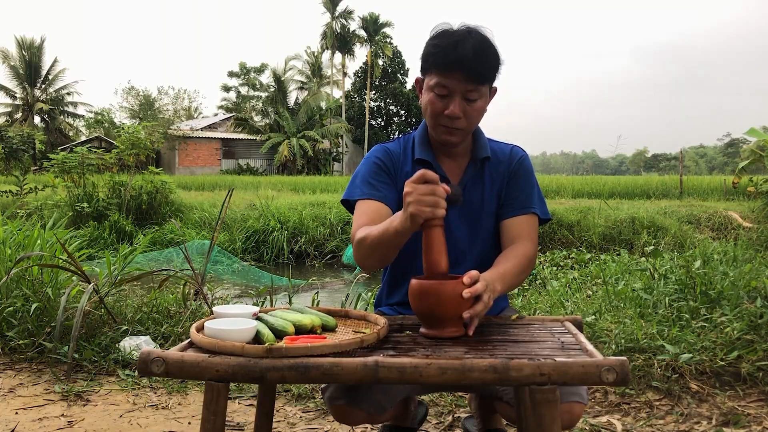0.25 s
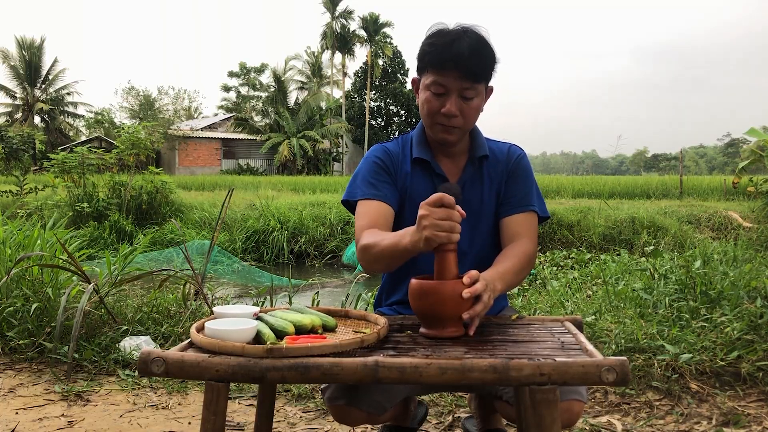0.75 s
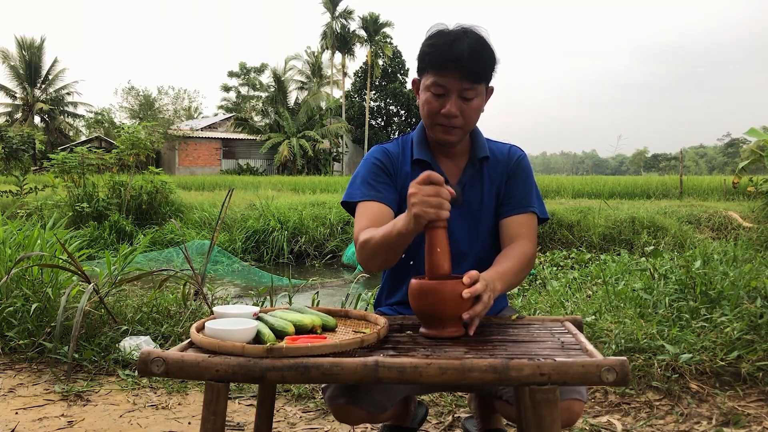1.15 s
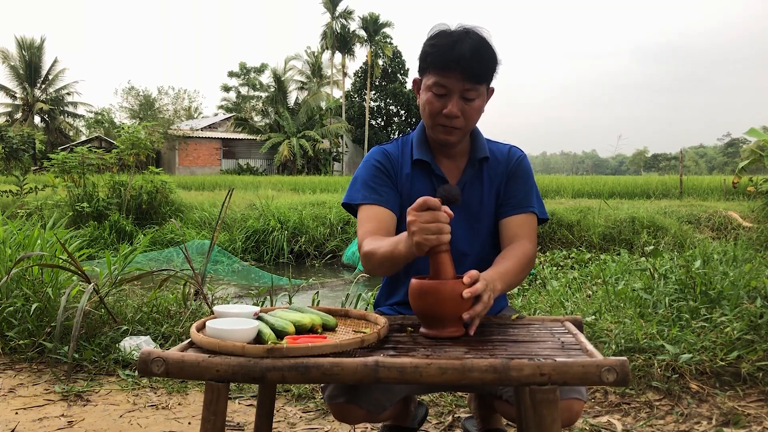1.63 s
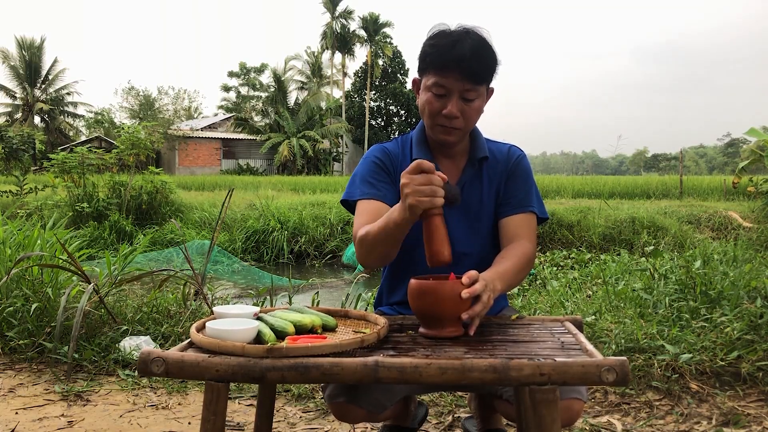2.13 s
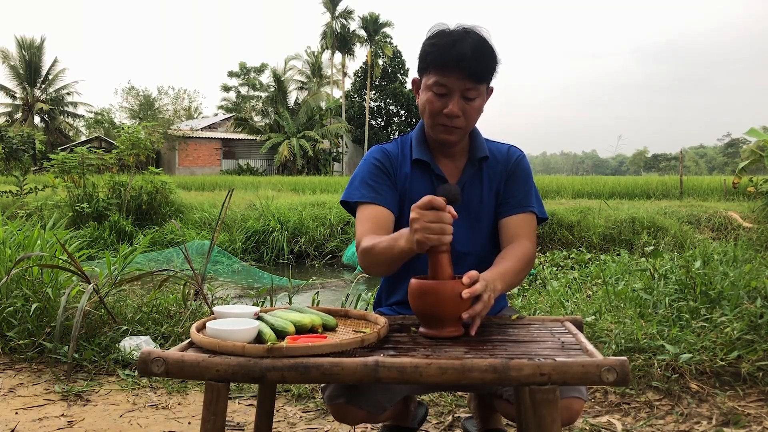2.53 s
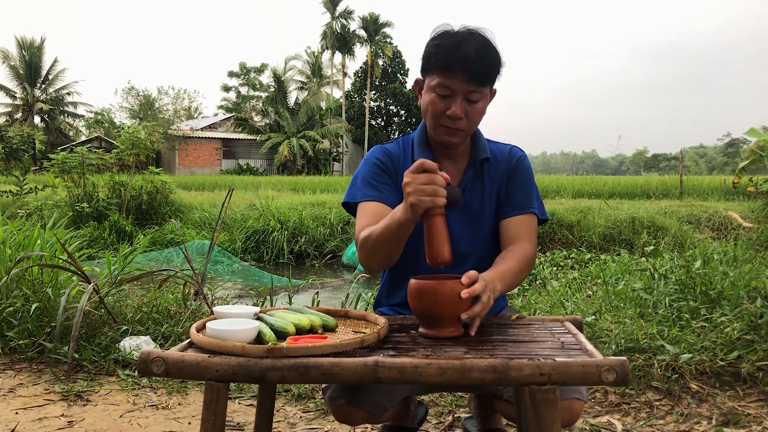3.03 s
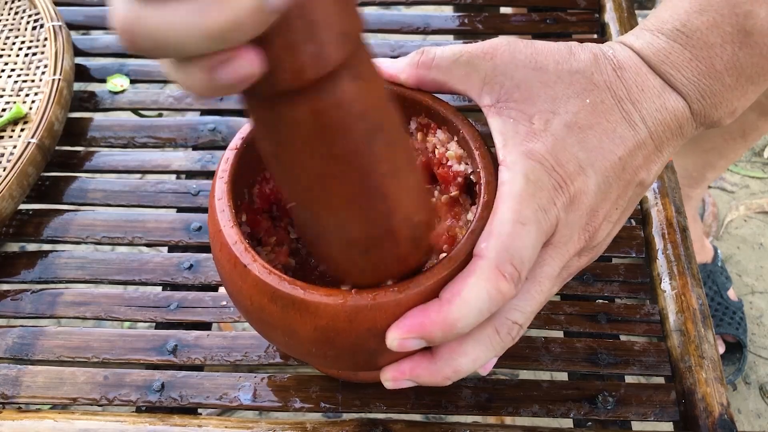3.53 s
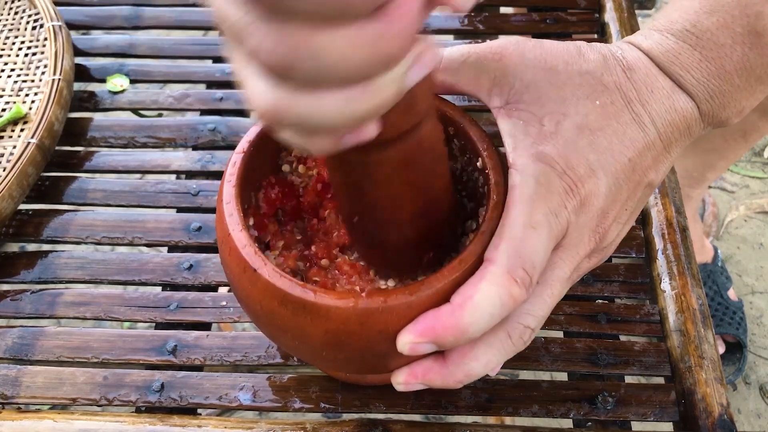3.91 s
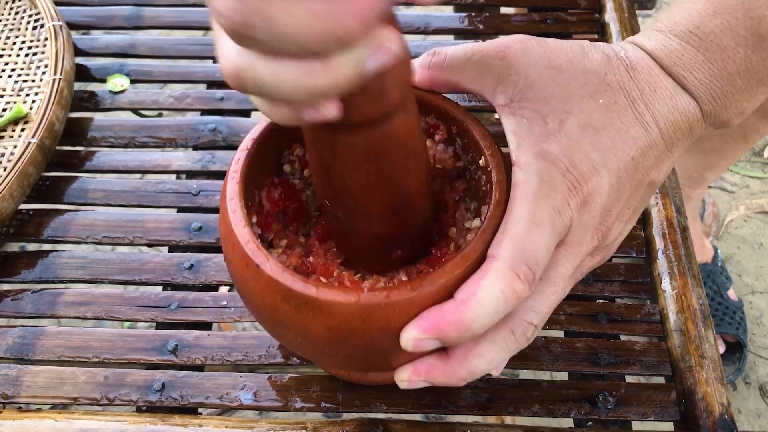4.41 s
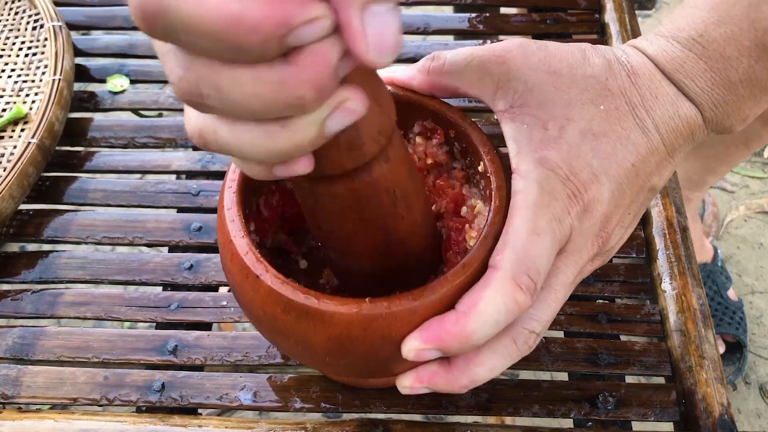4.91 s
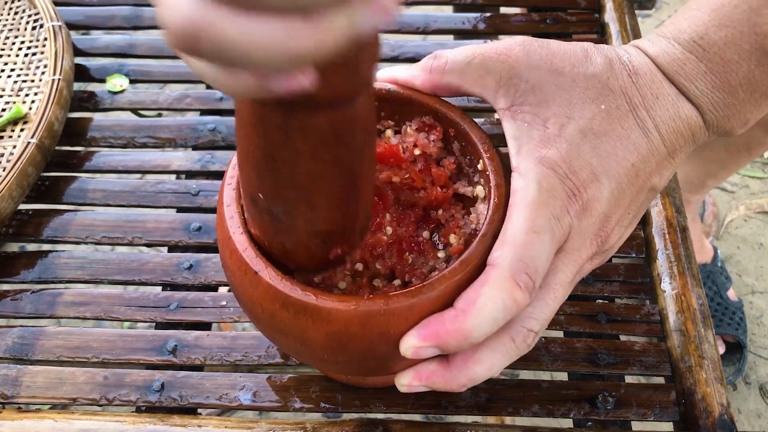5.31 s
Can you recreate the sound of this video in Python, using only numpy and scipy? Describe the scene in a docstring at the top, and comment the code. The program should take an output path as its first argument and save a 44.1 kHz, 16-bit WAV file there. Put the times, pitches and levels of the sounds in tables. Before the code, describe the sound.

A wooden pestle pounds coarse salt in a clay mortar, about three strokes a second. Each stroke is a crisp crunch with a short knock and a slight shake of the bamboo table, and loose grains slide and tick in between. The first strokes are heard from a distance over a faint outdoor hush. A little past halfway, a close microphone takes over, with slightly quicker strokes, clearer clay knocks and faint puffs of wind.

```python
"""Out in the fields, a wooden pestle pounds coarse salt in a clay mortar on a slatted bamboo table.
Each stroke crushes grains, rings the bowl, shakes the slats and thuds through the legs into the soil.
Loose salt slides and ticks between strokes, over a hush of open air and a far rumble. A distant, peaky
microphone hears the first strokes; then a close, flatter one takes over and catches puffs of wind."""
import sys
import numpy as np
from scipy import signal
from scipy.fft import rfft, irfft, next_fast_len
from scipy.io import wavfile
from scipy.ndimage import uniform_filter1d, map_coordinates

SR = 44100
rng = np.random.default_rng(int(sys.argv[2]) if len(sys.argv) > 2 else 0)


def int16_out(signal):
    """Quantize to a 16-bit WAV file."""
    q = np.round(np.clip(np.atleast_2d(signal).T, -1, 1) * 32767)
    wavfile.write(sys.argv[1], SR, q.astype(np.int16))


N = 245195
TIME = np.arange(N) / SR
SWITCH_S = 3.33  # the close microphone takes over; paired settings are (distant, close)


def amp(db):
    return 10 ** (np.asarray(db) / 20)


def unit(x):
    return x / np.sqrt(np.mean(x ** 2) + 1e-20)


def along(points, hz):
    """Interpolate (Hz, value) points on a log axis."""
    f, v = np.transpose(points)
    return np.interp(np.log(hz + 1), np.log(f + 1), v)


def peak(hz, centre, width, db):
    """A resonant bump or dip, in dB."""
    return db / (1 + (2 * (hz - centre) / width) ** 2)


def wobble(rate):
    """A smooth random curve, rate knots a second."""
    return map_coordinates(rng.standard_normal(N // 20), [TIME * rate])


def filtered(x, response):
    """x times a complex response of frequency."""
    size = next_fast_len(N + SR // 2)
    return irfft(rfft(x, size) * response(np.fft.rfftfreq(size, 1 / SR)), size)[..., :N]


def band(x, low_hz, high_hz):
    """The part of x between two soft edges."""
    under = lambda hz, edge: 1 / (1 + (hz / edge) ** 8)
    return filtered(x, lambda hz: under(hz, high_hz) - under(hz, low_hz))


def coloured(x, db_of):
    """x through a causal filter of energy 1, shaped by a dB curve."""
    hz = np.fft.rfftfreq(2048, 1 / SR)
    cepstrum = irfft(np.log(amp(db_of(hz)) + 1e-6))
    cepstrum[1:len(hz) - 1] *= 2
    cepstrum[len(hz):] = 0
    pulse = irfft(np.exp(rfft(cepstrum)))
    return signal.fftconvolve(x, pulse[None] / np.linalg.norm(pulse), axes=1)[:, :N]


def patchy(x, depth_db):
    """x with its colour shifting from moment to moment."""
    frames = signal.stft(x, nperseg=256)[2]
    field = uniform_filter1d(rng.standard_normal(frames.shape), size=2, axis=0)
    field = uniform_filter1d(field, size=6, axis=1)
    return signal.istft(frames * amp(depth_db * unit(field)), nperseg=256)[1][:N]


def close_mic():
    """0 on the distant microphone, 1 on the close one, with a 6 ms crossfade."""
    return np.clip((TIME - SWITCH_S) / .006 + .5, 0, 1)


# Open air at each microphone, and a rumble far off: (frequency [Hz], relative level [dB])
HUSH_DISTANT = [(180, -47.5), (300, -18.5), (585, -7.5), (951, -20), (1160, -11.5), (1920, -18.5),
                (2380, -5), (3280, -9), (6180, -0.5), (6720, -7.5), (8210, -34.5), (10900, -21.5),
                (13600, -36), (15200, -9), (16300, -38.5)]
HUSH_CLOSE = [(200, -31), (350, -13.5), (650, -1), (800, -6.5), (1250, -1), (1900, -5.5), (2500, -8),
              (3100, -8), (3700, -15), (4300, -8), (5000, -8.5), (8000, -13.5), (11000, -14.5),
              (14000, -10), (16300, -9.5)]
FAR_RUMBLE = [(15, -34), (25, -9), (71, -0.5), (130, 4), (243, -7.5), (282, -5.5), (400, -10), (520, -40),
              (880, -120)]


def field_air():
    """The hush of the fields, wavering a little, over a lumpy far rumble."""
    def noise(spectrum, depth_db):
        restless = patchy(rng.standard_normal(N), depth_db)
        return unit(filtered(restless, lambda hz: amp(along(spectrum, hz))))

    close = close_mic()
    hush = amp(-59) * noise(HUSH_DISTANT, 2.3) * (1 - close) + amp(-70) * noise(HUSH_CLOSE, 1.5) * close
    rumble_db = -74.5 - 3.5 * close + 1.8 * wobble(7.4) + 0.94 * wobble(3.8)
    return hush * amp(1.2 * wobble(37)) + amp(rumble_db) * noise(FAR_RUMBLE, 0.93)


# Strokes into the salt, timed at full pressure; levels are relative within each column:
# (time [s], table thump [dB], wait before lifting [ms], crush [dB], rise [ms], hold [ms], fall [ms],
# treble [dB], lows [dB], settling [dB], slide on lifting [dB], bowl [dB], slat buzz [dB],
# tilt toward high modes [dB])
STROKES = [(0.217, -55, 50, -20, 13, 2.3, 44, 0, -9, -40.5, -46.5, -30.5, -32.5, 7.5),
           (0.505, -69, 50, -16.5, 14.5, 17.8, 53, -1, -9, -37, -43, -41, -53, -2),
           (0.815, -43.5, 58, -17.5, 12, 2.33, 15, 3.5, 18, -39, -43, -21.5, -31.5, 3),
           (1.129, -54, 67, -13.5, 10.5, 1.96, 6.7, 0.5, 8.5, -43, -47, -30, -41, 0),
           (1.447, -73, 52, -17.5, 38, 13.4, 24, -3, 6, -40, -46.5, -46, -55, 0),
           (1.749, -45, 73, -15, 9, 1.12, 58, -2.5, 8.5, -40.5, -43, -37, -31, 13),
           (2.043, -56, 64, -19, 10, 0.78, 38, -1, -21, -43.5, -46, -51, -43.5, 15.5),
           (2.37, -60.5, 68, -19.5, 9, 8.8, 25, 5.5, 8, -40, -45, -39, -44, -7),
           (2.665, -49.5, 78, -18.5, 6.8, 2.24, 5.6, 3.5, -11, -40, -44.5, -43, -34.5, 0),
           (2.942, -65.5, 65, -17.5, 17, 3.2, 73, 0.5, -2.5, -42.5, -41, -39.5, -39, 15.5),
           (3.222, -69, 48, -16, 25, 14.5, 35, 0, 2.5, -41.5, -47, -39, -56.5, -1.5),
           (3.466, -60, 52, -32.5, 97, 23.2, 53, -3.5, -1.5, -67, -54, -29, -50, 5),
           (3.718, -78.5, 65.4, -20, 43, 0.68, 13, 3, -6.5, -61.5, -47, -48, -66, 15),
           (3.942, -76, 69, -27.5, 3.1, 40, 44, -2.5, 6.5, -54.5, -56, -55, -69, 0),
           (4.243, -42.5, 42, -19.5, 10.6, 4.33, 29, 1.5, 1, -53.5, -58.5, -20.5, -29.5, -7.5),
           (4.481, -72, 46, -35, 23, 29.2, 47, 3.5, 4.5, -65, -59.5, -45, -56.5, 17.5),
           (4.739, -78.5, 59, -32, 12, 17.4, 82, 3.5, -5, -59.5, -53, -64, -65, 0),
           (5.003, -63, 59, -32.5, 18, 9.4, 44, 5, 2, -59, -54, -37.5, -48, -3),
           (5.261, -68, 68.4, -29, 21, 1.59, 93, 5, -11, -58, -50.5, -67, -63, -4),
           (5.493, -80, 74, -39, 37, 28.6, 82, -3.5, -2, -56.5, -61, -66, -65, 0)]
# The pestle glances off the bowl's wall: (time [s], table thump [dB], crush [dB], lows [dB],
# bowl [dB], slat buzz [dB], tilt toward high modes [dB])
GLANCES = [(1.425, -65, -17, 8.5, -38, -39, 13), (3.402, -61.5, -23, -1.5, -18.5, -45, 5.5),
           (3.634, -76, -49, 3.5, -39.5, -58, -6), (3.942, -61, -22, 5, -20.5, -48, 12),
           (4.679, -78, -51, 16, -37, -68, -1), (4.942, -74, -35.5, 13, -20.5, -47.5, -4),
           (5.43, -70, -49, 14.5, -35, -52, -5), (5.469, -74, -50.5, 10.5, -38, -55, 4)]
# Single crystals crack: (time [s], level [dB], treble [dB])
CRACKS = [(0.019, -41.5, -6), (0.039, -45, -8.5), (0.62, -38.5, -5), (0.704, -39, 3.5), (0.758, -51.5, 10),
          (0.839, -39, -1), (0.951, -50.5, 11.5), (1.244, -44.5, 2.5), (2.347, -48, -3), (3.216, -42, 3),
          (2.875, -57.5, 17), (3.321, -42, 3), (3.509, -54, -8), (4.305, -50, -8), (4.565, -57, 4),
          (3.461, -34.5, 5), (4.628, -60.5, -2), (4.713, -56, -6), (4.725, -42, -7), (4.755, -39, 12),
          (4.814, -42.5, -12), (5.008, -34.5, 10), (5.328, -50, -4), (5.34, -50, -6), (5.508, -28, 6)]
# The pestle drags through salt: (time [s], level [dB], hold [ms])
DRAGS = [(3.419, -46.5, 11), (3.645, -64, 16), (3.689, -44.5, 38), (3.908, -60.5, 1.6), (4.696, -57.5, 36)]
# Loose salt, distant then close: (rise [ms], hold [ms], fall [ms], treble [dB], lows [dB])
SETTLE_SHAPE = (90, 3, 540, -0.2, 11.5), (40.4, 9.9, 250, 1.5, 10)
SLIDE_SHAPE = (140, 13, 100, -2, -4.5), (160, 22.2, 124, 0.1, -13)


def salt_presses():
    """Every push on the salt: (time [s], level [dB], rise, hold, fall [ms], treble, lows [dB])."""
    rows = [(0.0044, -46.5, *SETTLE_SHAPE[0])]  # still settling from an earlier stroke
    for s, _, wait, db, rise, hold, fall, treble_db, low_db, settle_db, slide_db, *_ in STROKES:
        end, mic = s + hold / 1000, int(s > SWITCH_S)
        rows.append((s, db, rise, hold, fall, treble_db, low_db))
        rows.append((end, settle_db, *SETTLE_SHAPE[mic]))
        rows.append((end + wait / 1000, slide_db, *SLIDE_SHAPE[mic]))
    rows += [(s, db, 6.4, 1.4, 19, -22, low_db) for s, _, db, low_db, *_ in GLANCES]
    rows += [(s, db, 4.8, 2.4, 15, treble_db, -15) for s, db, treble_db in CRACKS]
    return rows + [(s, db, 9, hold, 60, 0, 0) for s, db, hold in DRAGS]


# Crushed salt at each microphone: (frequency [Hz], relative level [dB])
CRUNCH_DISTANT = [(180, -73), (300, -47.5), (728, -28.5), (1180, -30), (1540, -34), (2420, -15.5),
                  (3220, -18.5), (4000, -8), (6080, 3), (7190, -11), (8350, -31.5), (10700, -24.5),
                  (13600, -24), (15000, -12), (16300, -25)]
CRUNCH_CLOSE = [(180, -52.5), (300, -24.5), (658, -22), (919, -5), (1070, -10.5), (1220, 1.5), (1570, -19),
                (2160, -5), (2510, -13), (2770, 0.5), (3170, -7), (3700, -12.5), (4300, -4), (5320, -1.5),
                (9230, -7), (15200, -6), (16300, -4.5)]
# The bowl resonating under the salt: (frequency [Hz], width [Hz], boost [dB])
BOWL_RESONANCES = [(1170, 87, -0.5), (2186, 150, -2.5), (2412, 146, 8.5), (2780, 170, 0), (5270, 180, 2),
                   (5975, 380, -1.5)]


def salt_crunch(snaps_per_s=1500):
    """Crystals snap at random, of very uneven size, as hard as the pestle presses."""
    snapping = rng.random(N) < snaps_per_s / SR
    sizes = amp(3.5 * np.minimum(rng.exponential(size=N), 2.5))
    snaps = snapping * sizes * rng.choice([-1, 1], N)
    clumps = amp(1.3 * wobble(400) + 2.15 * wobble(70))
    grit = unit(clumps * patchy(rng.standard_normal(N) + 0.68 * unit(snaps), depth_db=4))
    power = np.zeros((2, 3, N))  # microphone, band, sample
    for s, db, *ms, treble_db, low_db in salt_presses():
        rise, hold, fall = np.maximum(ms, .5) / 1000
        span = slice(max(0, round((s - rise) * SR)), round((s + hold + fall) * SR))
        slack = np.clip((s - TIME[span]) / rise, 0, 1) + np.clip((TIME[span] - s - hold) / fall, 0, 1)
        bands_db = np.array([[low_db], [0], [treble_db]])
        power[int(s > SWITCH_S), :, span] += amp(db - 60 * slack + bands_db) ** 2
        grit[min(N - 1, round(SR * (s + hold / 2)))] = 7  # one big crystal breaks at full pressure
    ring_db = lambda hz: sum(peak(hz, *resonance) for resonance in BOWL_RESONANCES)
    crunch = np.zeros(N)
    for force, spectrum, gate in zip(np.sqrt(power), (CRUNCH_DISTANT, CRUNCH_CLOSE), (1 - close_mic(), 1)):
        low, mid, high = coloured(grit * force * gate, lambda hz: along(spectrum, hz) + ring_db(hz))
        crunch += band(low, 20, 1705) + band(mid, 1580, 7020) + band(high, 6770, 22000)
    return crunch


# The clay bowl's modes: (frequency [Hz], level [dB], time to fall 60 dB [s])
CLAY_MODES = [(790, -9.5, 0.026), (952, 4.5, 0.015), (1160, -6.5, 0.029), (1712, -7.5, 0.025),
              (2200, -2, 0.0072), (2800, -5, 0.015), (3340, -10.5, .02), (5300, -8.5, 0.0089)]


def bowl_knocks(contact_s=0.00042):
    """Each knock of the pestle rings the clay's modes, a little off pitch every time."""
    bowl, t = np.zeros(N + SR), np.arange(SR // 2) / SR
    for s, *_, bowl_db, _, tilt_db in STROKES + GLANCES:
        ring = np.zeros(len(t))
        for hz, db, t60 in CLAY_MODES:
            spot_db = tilt_db * np.clip(np.log(hz / 1000) / 0.13, -1, 1)  # the spot struck tilts the modes
            dip_db = 0 if s > SWITCH_S else peak(hz, 960, 160, -12)  # the distant microphone's notch
            softness = 1 + (hz * contact_s) ** 4  # a longer contact is duller
            tone = np.sin(2 * np.pi * hz * rng.normal(1, 0.014) * t)
            ring += amp(db + spot_db + dip_db - 60 * t / t60) * tone / softness
        bowl[round(s * SR):][:len(t)] += amp(bowl_db - 5) * ring * (1 - np.exp(-t / 0.001))
    return bowl[:N]


# The bamboo slats under the mortar: (frequency [Hz], width [Hz], level [dB])
SLAT_MODES = [(149.8, 98, -8), (250.6, 41.7, 2), (447, 130, -9.5), (660, 58, 0), (840, 59, -12)]


def table_shake(mic_thump_db=(-3, -10), mic_buzz_db=(10.5, -1.5), buzz_t60_s=(.28, .12)):
    """A short push thumps the table, then its slats buzz; being light, they radiate little deep bass."""
    shake, t = np.zeros(N + SR), np.arange(SR // 2) / SR
    for s, thump_db, *_, buzz_db, _ in STROKES + GLANCES:
        mic = int(s > SWITCH_S)
        push = unit(t * np.exp(-t / 0.0008)) * amp(thump_db + mic_thump_db[mic])
        buzz = amp(buzz_db + mic_buzz_db[mic] - 60 * t / buzz_t60_s[mic]) * rng.standard_normal(len(t))
        shake[round(s * SR):][:len(t)] += push + buzz
    wood = lambda hz: sum((-1) ** k * amp(db) * 1j * hz * width / (centre ** 2 - hz ** 2 + 1j * hz * width)
                          for k, (centre, width, db) in enumerate(SLAT_MODES))
    return filtered(shake[:N], lambda hz: wood(hz) * (1j * hz / (170 + 1j * hz)) ** 2)


def ground_thuds(t60_s=.25):
    """The table's legs thud on the soil under each knock, 0.4 dB louder per dB of thump."""
    force = sum(amp(-66 + .4 * (thump_db + 60) - 60 * np.abs(TIME - s) / t60_s) * (TIME > s)
                for s, thump_db, *_ in STROKES + GLANCES)
    soil = unit(band(rng.standard_normal(N), 40, 170))
    return band(force * soil, 30, 220)


# Crystals ringing in the bowl: (time [s], frequency [Hz], level [dB], time to fall 60 dB [s])
RINGING_CRYSTALS = [(1.425, 5100, -35, 0.0097), (2.115, 5120, -32.5, 0.054), (4.814, 4350, -35, 0.037),
                    (5.009, 2120, -32.5, 0.043), (5.262, 4990, -27, 0.048)]


def crystal_pings():
    """Now and then a crystal rings briefly with one damped tone."""
    return sum(amp(db - 60 * np.abs(TIME - s) / t60) * np.sin(2 * np.pi * hz * (TIME - s)) * (TIME > s)
               for s, hz, db, t60 in RINGING_CRYSTALS)


# Wind on the close microphone: (time [s], level [dB], width [s])
GUSTS = [(3.75, -64.5, .03), (4.0, -66, 0.068), (5.03, -68, 0.032)]


def wind_puffs():
    """Air brushes the microphone in short, low flutters."""
    gusts = sum(amp(db) * np.exp(-((TIME - s) / width) ** 2) for s, db, width in GUSTS)
    return gusts * unit(band(rng.standard_normal(N), 35, 110))


def scene():
    """The mortar and its table in the open air, in mono."""
    pounding = salt_crunch() + bowl_knocks() + table_shake() + ground_thuds() + crystal_pings()
    return (field_air() + pounding + wind_puffs())[None]


def record(dry):
    """The recorder thins the deepest bass and keeps nothing above its band limit."""
    bass_hz, top_hz = 32, 16300
    top = lambda hz: np.sin(np.pi / 2 * np.clip((top_hz - hz) / 700, 0, 1)) ** 2
    return filtered(dry, lambda hz: (1j * hz / (bass_hz + 1j * hz)) ** 2 * top(hz))


dry = scene()
out = record(dry)
int16_out(out)
```